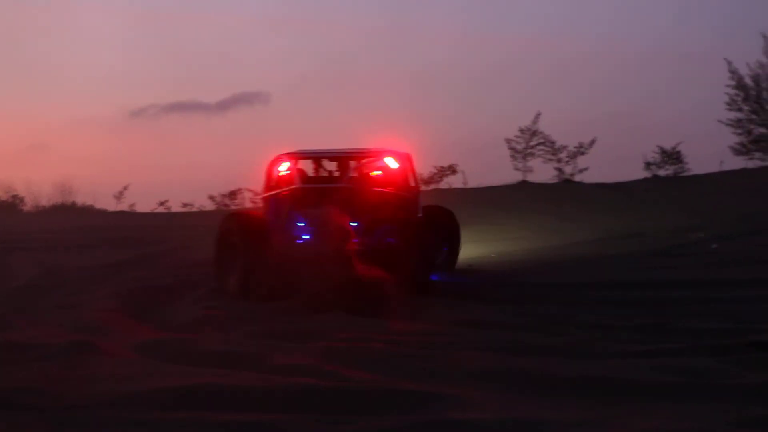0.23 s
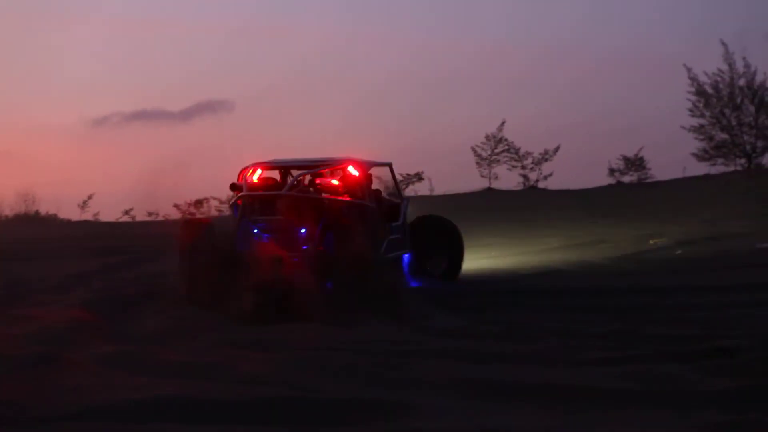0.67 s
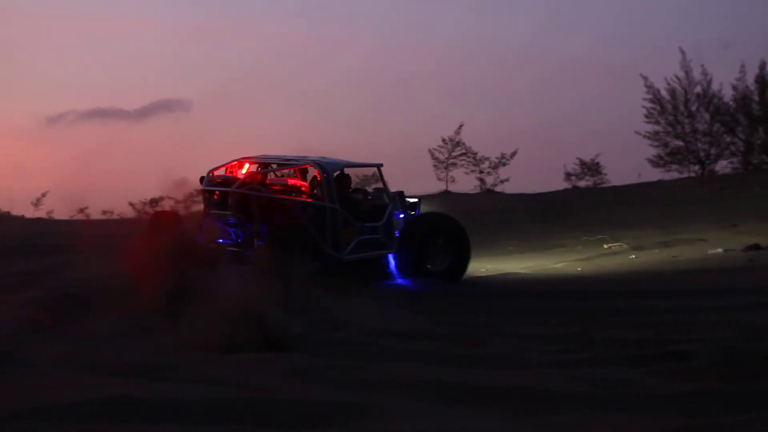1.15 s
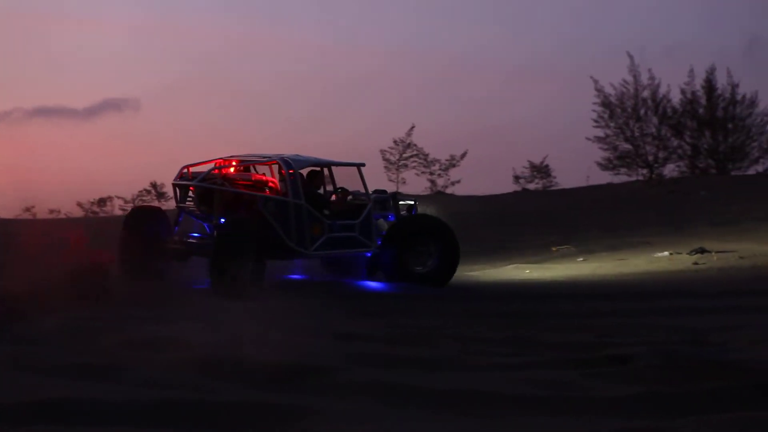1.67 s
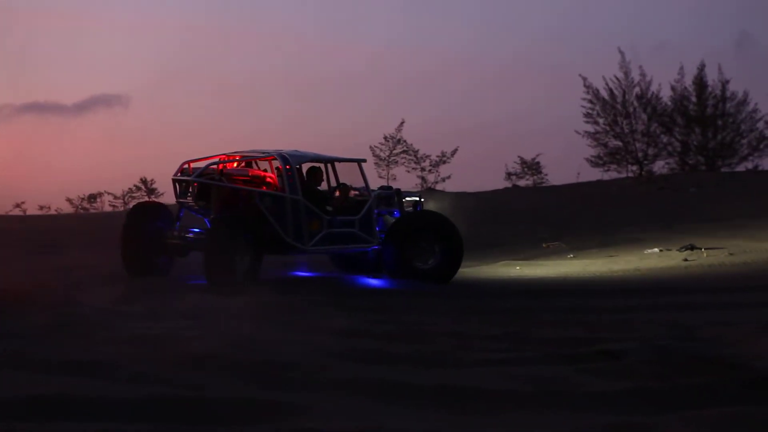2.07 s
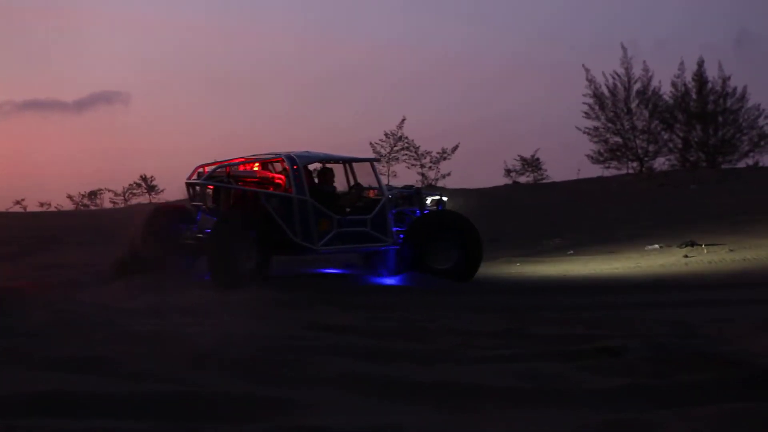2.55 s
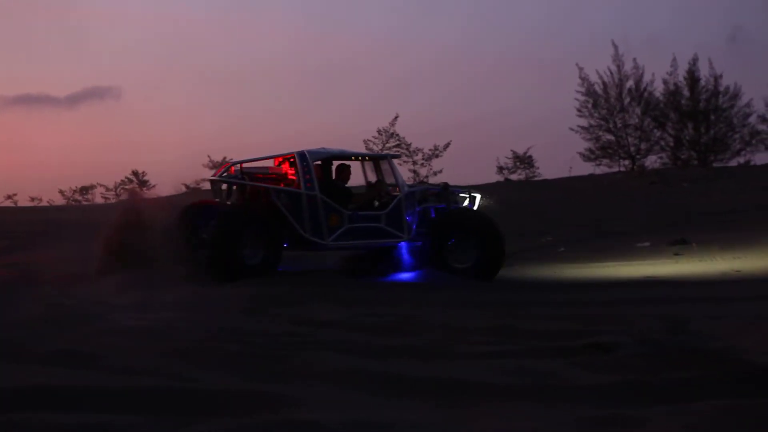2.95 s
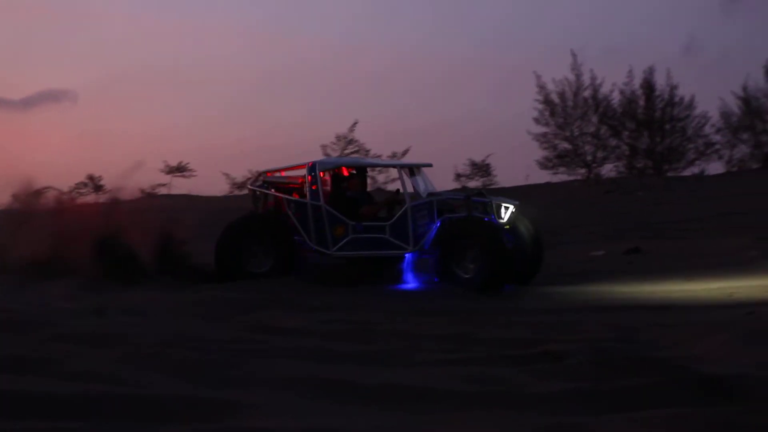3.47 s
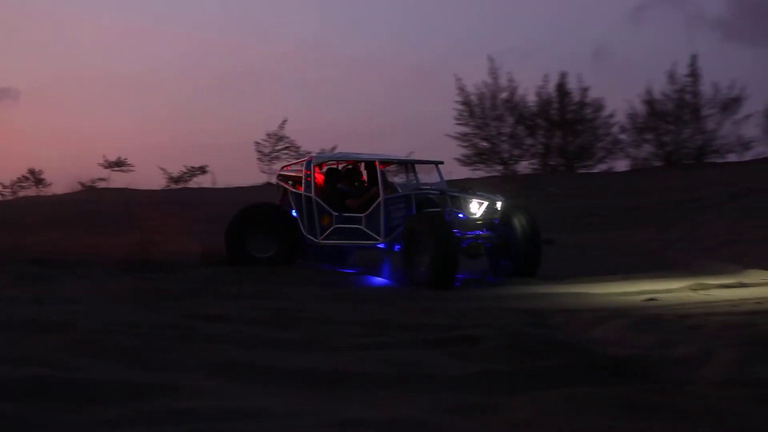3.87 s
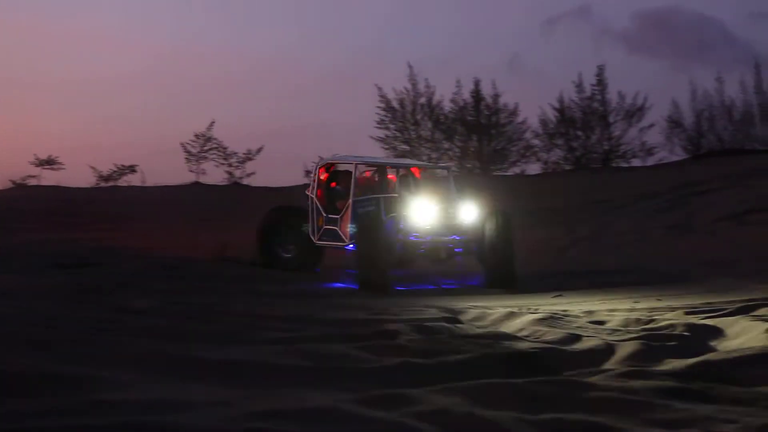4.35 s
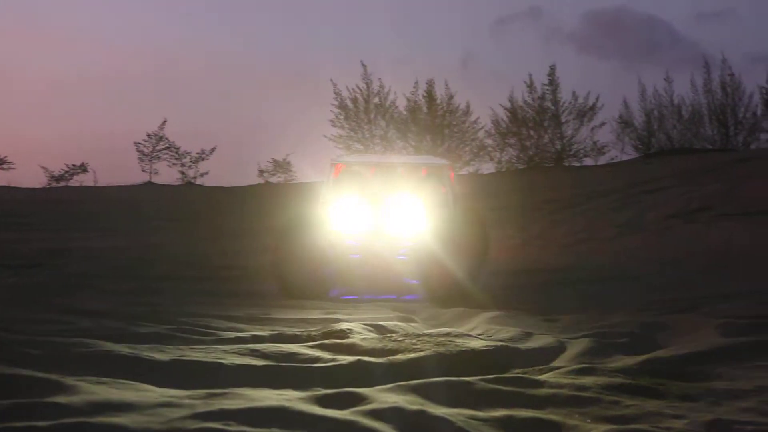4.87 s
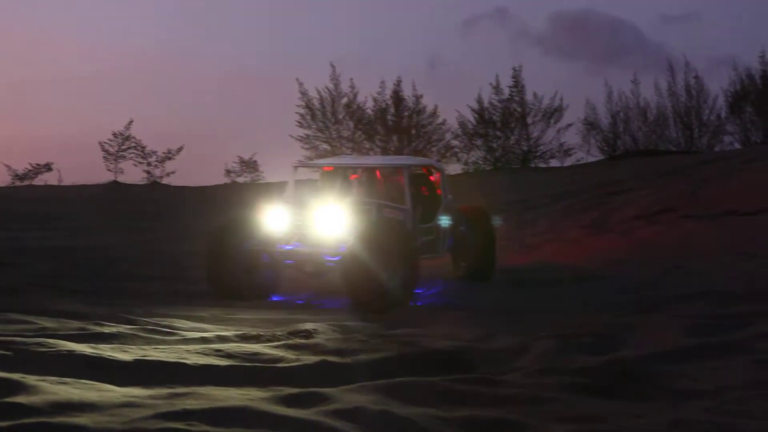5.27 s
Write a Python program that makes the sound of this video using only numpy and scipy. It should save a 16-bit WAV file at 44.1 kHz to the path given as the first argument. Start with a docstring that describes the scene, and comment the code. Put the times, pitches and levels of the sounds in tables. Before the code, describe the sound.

A buggy engine drones and barks through three revs outdoors, with ticking grit and a brief brake squeal at the end.

```python
"""On an open dune, one microphone stands behind a sand buggy that turns side-on, then faces it.
Its cross-plane V8 is revved three times and sinks to a lumpy idle in between. Revs, throttle and heading
set how the twin pipes drone, bark and crackle. The tyres spray sand, the running gear squeaks and grains
tick on the frame. A faint whine shows at idle, unburnt fuel puffs twice as the throttle shuts,
and at the very end a brake starts to squeal."""
import sys
import numpy as np
from scipy import signal
from scipy.fft import rfft, irfft, next_fast_len
from scipy.io import wavfile
from scipy.ndimage import uniform_filter1d, map_coordinates

SR = 44100
rng = np.random.default_rng(int(sys.argv[2]) if len(sys.argv) > 2 else 0)


def dump(signal):
    """Clip the signal to [-1, 1] and save it as 16-bit WAV at the path in sys.argv[1]."""
    limited = np.clip(np.atleast_2d(signal).T, -1, 1)
    pcm = np.round(limited * 32767).astype(np.int16)
    wavfile.write(sys.argv[1], SR, pcm)


N = 242991
TIME = np.arange(N) / SR


def amp(db):
    """Decibels to gain."""
    return 10 ** (np.asarray(db) / 20)


def unit(x):
    """Scale to rms 1."""
    return x / np.sqrt(np.mean(x ** 2) + 1e-20)


def steady(x, size=6000):
    """Hold the running rms at 1, keeping the fast throb."""
    power = uniform_filter1d(uniform_filter1d(x ** 2, size), size // 2)
    return x / np.sqrt(np.abs(power) + 1e-12)


def curve(rows):
    """Join (time_s, value) points into one value per sample."""
    return np.interp(TIME, *np.transpose(rows))


def wobble(rate):
    """A smooth random curve, rate knots a second."""
    knots = rng.standard_normal(int(N * rate / SR) + 4)
    grid = np.arange(0, len(knots) - 1, 1 / 8)
    return np.interp(TIME * rate, grid, map_coordinates(knots, [grid]))


def colour(x, points):
    """Causal filter with the gain of (frequency_hz, gain_db) points."""
    size = 2 ** 18
    hz, db = np.transpose(points)
    log_gain = np.log(amp(np.interp(np.log(np.fft.rfftfreq(size, 1 / SR) + 1), np.log(hz), db)))
    # folding the cepstrum gives minimum phase
    cepstrum = irfft(log_gain)
    cepstrum[1:size // 2] *= 2
    cepstrum[size // 2 + 1:] = 0
    return irfft(rfft(x, size) * np.exp(rfft(cepstrum)), size)[:N]


# engine speed in four-stroke cycles, eight firings to each: time_s, cycle_hz
CYCLE_RATE = [(0, 22.6), (.1, 23.6), (.2, 27.6), (.41, 28.4), (.48, 33), (.58, 32.4), (.7, 36.7),
              (.87, 32.8), (1.02, 24.6), (1.19, 16.8), (1.5, 9.8), (1.78, 6.92), (2.05, 7.16), (2.38, 15.4),
              (2.6, 18.3), (2.85, 24.1), (3.06, 30.4), (3.15, 32.5), (3.24, 31.8), (3.4, 28.8),
              (3.64, 16.7), (3.74, 20.5), (3.94, 22.9), (4.2, 20.9), (4.35, 21.1), (4.76, 12.84),
              (5.1, 9.74), (5.51, 6.6)]
CRUISE_HZ = 28

def revs():
    """Engine speed over cruising speed."""
    return curve(CYCLE_RATE) / CRUISE_HZ


# the driver's foot: time_s, throttle (0 shut, 1 full)
PEDAL = [(0, 0.59), (.24, 0.51), (.35, .65), (.64, 0.65), (.72, 0.39), (.96, .34), (1.36, 0.2), (1.92, .2),
         (2.04, 0.8), (2.22, 0.83), (2.45, 0.7), (2.68, 0.82), (3.06, 0.81), (3.27, 0.45), (3.31, 0.27),
         (3.62, 0.2), (3.72, 0.58), (3.99, 0.31), (4.66, 0.03), (5.4, 0.18)]

def load(gain, power):
    """Cylinder load 0-1: it builds late in the pedal's travel."""
    return np.clip(gain * np.clip(curve(PEDAL), .001, 1) ** power, 0, .95)


# the buggy's turn: time_s, heading_deg (0 tail to the microphone, 180 nose to it)
TURN = [(0, 5.5), (.55, 10.6), (1, 46.3), (2.2, 50), (3.1, 92.3), (4.2, 116), (4.7, 198), (5.5, 216)]

def heading():
    """The buggy's heading in radians."""
    return np.radians(curve(TURN))


def twin_pipes(order, depth, gap_m=0.98):
    """Power from both pipes: from behind even orders add and odd ones cancel; side-on, one pipe lags."""
    lag_s = gap_m * np.sin(heading()) / 343
    return 1 + (-1) ** order * depth * np.cos(2 * np.pi * order * curve(CYCLE_RATE) * lag_s)


def partial(cycle, order):
    """An engine order: a tone at one multiple of the cycle rate, at rms 1."""
    return np.sqrt(2) * np.cos(2 * np.pi * (order * cycle + rng.random()))


# burble from the uneven firing of each bank: order, level_db
WEAK_ORDERS = [(2, -19.5), (4, -14), (6, -7), (7, -4.5), (9, -2), (10, -6.5), (11, 4.5), (12, -7), (13, 3),
               (14, -7.5), (15, -18.5), (16, 5), (17, -9.5), (18, -28), (19, -7), (21, -7), (24, -6.5),
               (27, -1.5), (29, -20.5), (32, -2)]

def overtones(cycle):
    """The weaker orders, each swaying on its own; from the side the two pipes notch some of them."""
    notch = 0.89 * np.abs(np.sin(heading()))
    return sum(np.sqrt(twin_pipes(order, notch)) * amp(db + 3.77 * wobble(16)) * partial(cycle, order)
               for order, db in WEAK_ORDERS)


# strength of each firing in the cycle: level_db
FIRING_DB = [7.5, -2.5, 9.5, -11.5, 8.5, 6, -4.5, -0.5]

def firings(cycle, scatter_db):
    """One impulse per firing, sized by its cylinder and by chance."""
    at = np.flatnonzero(np.diff(np.floor(cycle * len(FIRING_DB))))
    sizes = amp(np.resize(FIRING_DB, len(at)) + scatter_db * rng.standard_normal(len(at)))
    return np.bincount(at, sizes, N)


def puffs(cycle, sharpness, scatter_db):
    """Each firing lets out a swell of turbulent gas, longer at low revs and ragged within itself."""
    beat = cycle * len(FIRING_DB)
    firing = beat.astype(int)
    count = firing[-1] + 1
    size_db = 0.62 * np.resize(FIRING_DB, count) + scatter_db * np.tanh(rng.standard_normal(count))
    swell = np.exp(-sharpness * np.cos(2 * np.pi * beat))
    return swell * amp(size_db[firing] + 1.6 * np.tanh(wobble(800))) * rng.standard_normal(N)


# lift from the pipe resonances: pitch_hz, gain_db
PIPE_BOOM = [(50, -29.5), (80, 6.5), (105, 10.5), (135, 4), (170, 3), (220, 6), (260, 3.5), (300, -7)]

def order_power(order, db, throttle_db):
    """A strong order booms as it sweeps through the resonances of the pipes."""
    boom_hz, boom_db = np.transpose(PIPE_BOOM)
    lift_db = np.interp(np.log(order * curve(CYCLE_RATE)), np.log(boom_hz), boom_db)
    return twin_pipes(order, depth=0.98) * amp(db + lift_db + throttle_db * (curve(PEDAL) - .5)) ** 2


# the drone's main tones: order, half_throttle_db, shut_to_full_gain_db
STRONG_ORDERS = [(3, -4.5, -8.5), (5, -1.5, -1.5), (8, 0, 5.5)]
# the burble's ring in the pipes, and its dulling with the throttle shut: frequency_hz, gain_db
PIPE_RING = [(25, -26.5), (50, -7), (70, 0.5), (92, 10), (130, 6.5), (170, 1.5), (220, 2.5), (260, -8),
             (300, -13.5), (360, -23.5), (450, -31), (700, -63.5)]
SHUT_DULLING = [(120, 1), (230, -2.5), (300, -12.5), (450, 0.5)]
# the drone at the microphone, one list for each rev: time_s, level_db
DRONE_BY_REV = [
    [(0.0, -13.5), (0.182, -17), (0.386, -13.5), (0.794, -22.5), (0.932, -19.5), (1.236, -26),
     (1.478, -25.5), (1.65, -38)],
    [(1.66, -36), (1.806, -38), (2.244, -13), (2.45, -19), (2.696, -13.5), (3.422, -20), (3.598, -27.5),
     (3.62, -23)],
    [(3.63, -36), (3.666, -23), (3.78, -18.5), (4.268, -23.5), (4.446, -28), (4.666, -22), (5.378, -31),
     (5.51, -27)],
]

def drone(cycle, orders):
    """The exhaust's low voice: three strong orders share its power with a burble ringing in the pipes."""
    coasting = 1 - load(gain=3.4, power=2.5)
    powers = [order_power(*row) for row in STRONG_ORDERS]
    tone_power = sum(powers)
    burble_power = 1 + 0.097 * tone_power  # the strong orders spill into the burble
    sway_db = 1.23 + 0.45 * coasting
    tones = sum(np.sqrt(power) * amp(sway_db * wobble(26)) * partial(cycle, order)
                for (order, _, _), power in zip(STRONG_ORDERS, powers))
    ringing = steady(colour(orders, PIPE_RING))
    burble = (1 - coasting) * ringing + coasting * colour(ringing, SHUT_DULLING)
    # off the throttle combustion is erratic, which fills the gaps between the orders
    erratic = firings(cycle, scatter_db=0) * np.tanh(3 * rng.standard_normal(N))
    burble += amp(-9.5 + 3.7 * coasting) * steady(colour(erratic, PIPE_RING))
    voice = tones + np.sqrt(burble_power) * steady(burble, size=4000)
    return amp(curve(np.concatenate(DRONE_BY_REV))) * voice / np.sqrt(tone_power + burble_power)


def loudness(full_db, octave_db, shut_db, front_db, floor_db):
    """Exhaust gain: full_db from behind at cruising revs and full throttle; the body shades the front."""
    facing = (1 - np.cos(heading())) / 2
    db = full_db + octave_db * np.log2(revs()) - shut_db * (1 - curve(PEDAL)) - front_db * facing
    return np.hypot(amp(db), amp(floor_db))


# tailpipe tone (upper bark end-on and side-on, hollow body, snarl): frequency_hz, gain_db
BARK_END_ON = [(500, -38.5), (760, -15), (860, -2), (970, -2.5), (1070, -3.5), (1210, -4.5), (1350, -9.5),
               (1500, -14), (1750, -19.5), (2150, -23.5), (3000, -41)]
BARK_SIDE_ON = [(500, -49), (760, -9.5), (880, 2), (1010, -3), (1200, 4), (1390, 2), (1510, -7.5),
                (1640, -3.5), (1830, -22.5), (2020, -10), (3000, -35.5)]
HOLLOW_RING = [(240, -43.5), (340, -13.5), (430, -2), (520, 2), (590, 2), (660, -3), (740, -8), (850, -12),
               (1300, -63)]
SNARL_BAND = [(270, -14.5), (320, 1), (365, 6), (430, 3), (540, 3), (700, 0), (950, -32.5)]
# level at the microphone: full_db, gain_per_octave_db, shut_loss_db, front_loss_db, idle_floor_db
HOLLOW_LOUDNESS = (-23, 11.5, 20.5, 4, -63)
UPPER_LOUDNESS = (-13.5, 10, 33, 13, -61)

def bark(cycle, orders):
    """Pressure fronts and their turbulence ring the tailpipes; with the throttle shut the flow is even."""
    drive = load(gain=1.32, power=1.9)
    side = np.abs(np.sin(heading())) ** 3
    fronts = revs() ** 2 * steady(firings(cycle, scatter_db=1.5))  # steeper with the revs
    gas = steady(puffs(cycle, sharpness=0.56, scatter_db=-1.5))
    jet = np.sqrt(drive) * steady(fronts + gas) + np.sqrt(1 - drive) * rng.standard_normal(N)
    upper = np.sqrt(1 - side) * steady(colour(jet, BARK_END_ON))
    upper += np.sqrt(side) * steady(colour(jet, BARK_SIDE_ON))
    # under load the higher orders snarl, most along the line of the pipes
    snarl_gain = amp(1 - 2 * side) * (drive + 0.082) * np.minimum(revs(), 1)
    snarl = snarl_gain * steady(colour(orders, SNARL_BAND))
    hollow = amp(-0.5 - 2.3 * drive) * steady(colour(jet, HOLLOW_RING)) + snarl
    return loudness(*HOLLOW_LOUDNESS) * hollow + loudness(*UPPER_LOUDNESS) * steady(upper)


def flicker(x, depth_db):
    """Every few milliseconds the gas jet takes a new colour."""
    spectra = signal.stft(x, nperseg=256)[2]
    patches = uniform_filter1d(rng.standard_normal(spectra.shape), size=7, axis=0)
    patches = uniform_filter1d(patches, size=3, axis=1)
    return signal.istft(spectra * amp(depth_db * unit(patches)), nperseg=256)[1][:N]


# tone of the exhaust cracks and of the hiss: frequency_hz, gain_db
CRACK_BAND = [(900, -22), (1900, -2.5), (3400, -0.5), (4100, -6.5), (5000, -0.5), (5900, -5.5),
              (6700, -0.5), (8500, -8), (11000, -14.5), (15500, -30)]
HISS_BAND = [(900, -25.5), (1800, 1.5), (2150, 2), (2600, 5.5), (3200, 1.5), (4400, 1.5), (5500, 3.5),
             (7000, 1), (8000, -4), (9200, -13), (12000, -28.5), (15500, -48)]
# level at the microphone: full_db, gain_per_octave_db, shut_loss_db, front_loss_db, idle_floor_db
RASP_LOUDNESS = (-22.5, 6, 25, 6.5, -77.5)

def rasp(cycle):
    """An open throttle makes each firing crack; when it closes, a smooth hiss of fan and sand is left."""
    drive = load(gain=1.34, power=2.2)
    # a labouring engine at low revs cracks sharper and brighter
    labour = np.clip((23 - curve(CYCLE_RATE)) / 11, 0, 1)
    bursts = puffs(cycle, sharpness=0.55 + 0.37 * labour, scatter_db=1.2)
    cracks = flicker(colour(bursts, CRACK_BAND), depth_db=4)
    cracks = steady(cracks - 0.72 * labour * np.roll(cracks, 1))
    hiss = unit(colour(rng.standard_normal(N) * amp(1.46 * wobble(90)), HISS_BAND))
    return loudness(*RASP_LOUDNESS) * (np.sqrt(drive) * cracks + np.sqrt(1 - drive) * hiss)


# sand flung by the rear tyres towards the microphone: time_s, level_db
SAND_LEVEL = [(0, -54), (.35, -40), (.75, -44), (.95, -37), (1.2, -53), (1.6, -67), (1.8, -94)]

def sand_spray():
    """Showers of tiny bright sand impacts, falling in clumps and thinning to single ticks."""
    db = curve(SAND_LEVEL)
    density = np.maximum(amp(1.1 * (db - db.max())), .03)
    lands = rng.random(N) < 2500 * density * amp(6 * np.tanh(wobble(45))) / SR
    grains = lands * rng.standard_normal(N) * amp(3.2 * np.tanh(wobble(110))) / np.sqrt(density)
    return amp(db) * unit(colour(grains, [(2000, -16), (6500, 6), (10000, -6.5), (15500, -14)]))


# squeaks from the running gear: centre_s, pitch_hz, level_db, half_length_s
GEAR_SQUEAKS = [(0.621, 2114, -42, 0.04), (.71, 5140, -40, 0.022), (.78, 5650, -36, .018),
                (1.581, 8450, -48.5, .005), (2.164, 6562, -28, 0.0021), (2.987, 6760, -27, .0026),
                (3.329, 5770, -42, 0.0074), (3.334, 5200, -41, 0.011), (3.721, 2025, -47, .016)]

def squeaks():
    """Metal parts rub briefly, each on one unsteady tone."""
    out = np.zeros(N)
    waver = np.cumsum(.03 * wobble(900)) / SR
    for centre, hz, db, half_length in GEAR_SQUEAKS:
        near = np.abs(TIME - centre) < .12
        t = TIME[near] - centre
        swell = amp(db) * np.exp(-(t / half_length) ** 2 / 2)
        out[near] += np.sqrt(2) * swell * np.sin(2 * np.pi * hz * (t + waver[near]))
    return out


# grit landing on the frame: start_s, peak_db, ring_hz
GRIT_HITS = [(0.8109, -26, 4140), (0.898, -19, 6655), (0.952, -21.5, 4860), (1.1678, -27.5, 4860),
             (1.212, -31, 6500), (1.275, -30.5, 6500), (1.43, -35, 6950), (3.993, -30.5, 5574),
             (4.0854, -27.5, 5110), (4.0915, -25, 6160), (4.2008, -32, 5420), (4.3578, -24.5, 5580),
             (4.371, -33.5, 5120), (4.5229, -41, 5055), (4.7698, -26, 5700)]

def grit():
    """Thrown grains strike the frame with a short bright ring."""
    out, t = np.zeros(N + SR), TIME[:SR // 16]
    decay = amp(-60 * t / 0.012)  # 60 dB in 12 ms
    for start, db, hz in GRIT_HITS:
        band = signal.butter(2, [hz * 0.79, hz * 1.172], "band", fs=SR, output="sos")
        tick = signal.sosfilt(band, rng.standard_normal(len(t)) * decay)
        out[round(start * SR):][:len(t)] += amp(db) * tick / np.abs(tick).max()
    return out[:N]


# spells of whine at idle: start_s, end_s, pitch_hz, level_db
WHINE_SPELLS = [(1.53, 2.15, 987, -54), (4.6, 4.92, 1002, -66.5), (5.26, 5.507, 998, -60)]

def idle_whine(fade_db_per_s=128.5):
    """A thin, slightly unsteady tone, likely a pump, heard when the engine is quiet."""
    out = np.zeros(N)
    for start, end, hz, db in WHINE_SPELLS:
        fade_db = fade_db_per_s * np.abs(TIME - np.clip(TIME, start, end))
        gain = amp(db - fade_db + wobble(11))
        out += gain * np.sin(2 * np.pi * np.cumsum(hz + 4 * wobble(30)) / SR)
    return np.sqrt(2) * out


# puffs with the buggy side-on to the microphone: centre_s, hollow_db, upper_db
FUEL_PUFFS = [(3.236, -35, -28.5), (3.442, -34, -43.5)]

def afterfires(half_length_s=0.012):
    """As the throttle shuts, unburnt fuel puffs softly through the tailpipe resonances."""
    gas = rng.standard_normal(N)
    hollow, upper = unit(colour(gas, HOLLOW_RING)), unit(colour(gas, BARK_SIDE_ON))
    out = np.zeros(N)
    for centre, hollow_db, upper_db in FUEL_PUFFS:
        swell = np.exp(-((TIME - centre) / half_length_s) ** 2 / 2)
        out += swell * (amp(hollow_db) * hollow + amp(upper_db) * upper)
    return out


# partials of the brake disc: pitch_hz, relative_db
DISC_PARTIALS = [(4962, -0.5), (9924, -50), (14886, -52.5)]

def brake_squeal(takes_hold_s=5.441, growth_db_per_s=895, ceiling_db=-16):
    """A disc mode grows by stick-slip until it saturates."""
    growth = amp(np.clip(growth_db_per_s * (TIME - takes_hold_s), -200, 200))
    clock = np.cumsum(1 + 0.00051 * wobble(36)) / SR
    tone = np.sqrt(2) * sum(amp(db) * np.sin(2 * np.pi * hz * clock) for hz, db in DISC_PARTIALS)
    return amp(ceiling_db) * growth / (1 + growth) * tone


def scene():
    """The buggy in open air; drone, bark and rasp all follow one crankshaft."""
    cycle = np.cumsum(curve(CYCLE_RATE) * (1 + .002 * wobble(25))) / SR
    orders = overtones(cycle)
    engine = drone(cycle, orders) + bark(cycle, orders) + rasp(cycle)
    return (engine + sand_spray() + squeaks() + grit() + idle_whine() + afterfires() + brake_squeal())[None]


def record(dry, top_hz=15800):
    """One microphone, with nothing kept above its band limit."""
    size = next_fast_len(N + SR // 2)
    in_band = np.fft.rfftfreq(size, 1 / SR) < top_hz
    return irfft(rfft(dry, size) * in_band, size)[:, :N]


dry = scene()
out = record(dry)
dump(out)
```